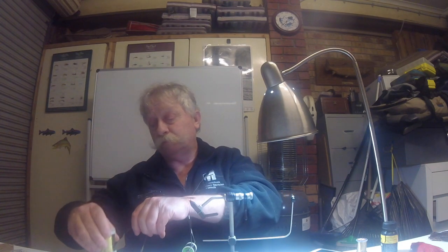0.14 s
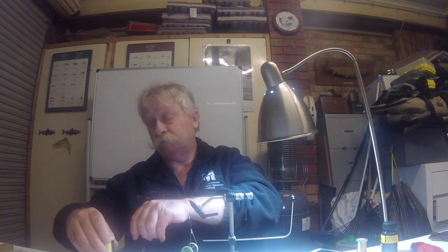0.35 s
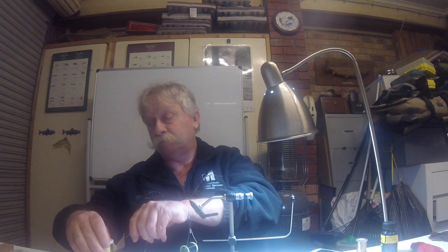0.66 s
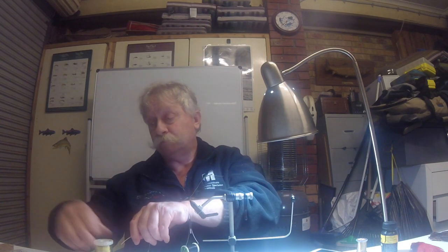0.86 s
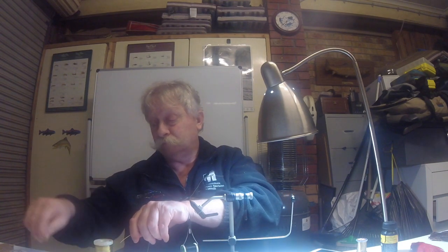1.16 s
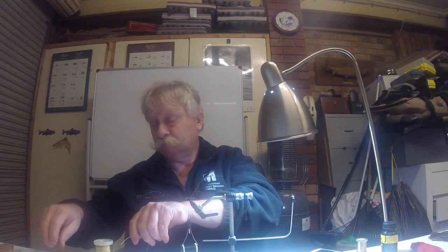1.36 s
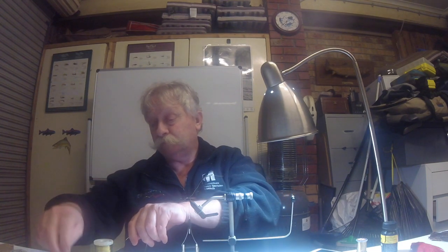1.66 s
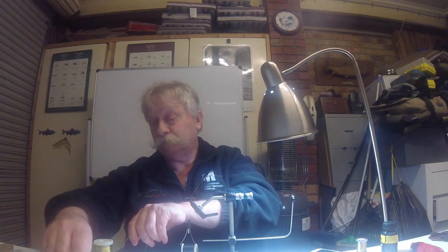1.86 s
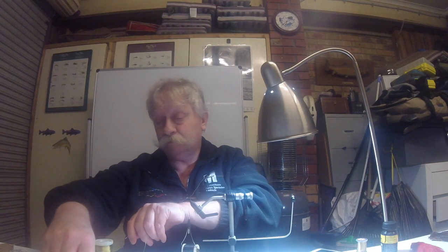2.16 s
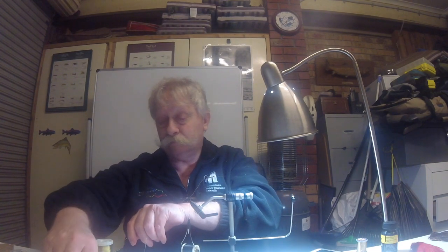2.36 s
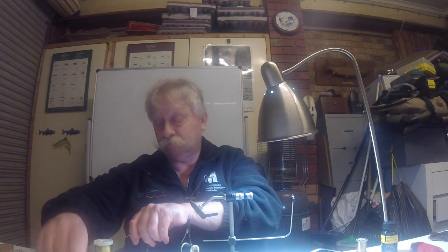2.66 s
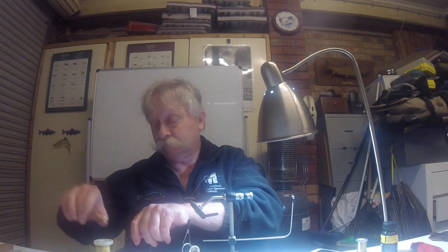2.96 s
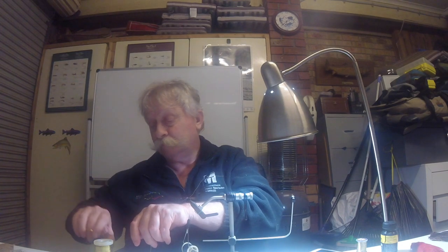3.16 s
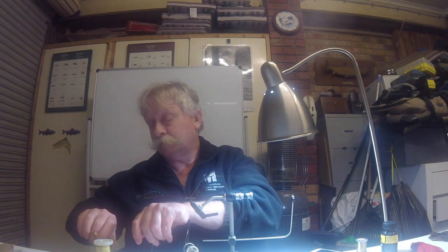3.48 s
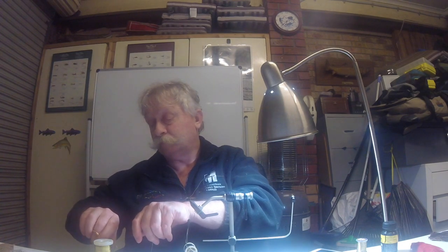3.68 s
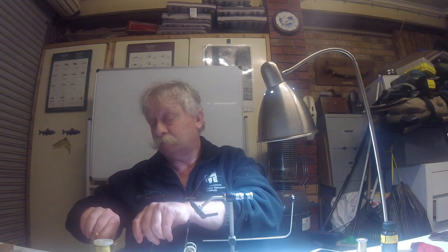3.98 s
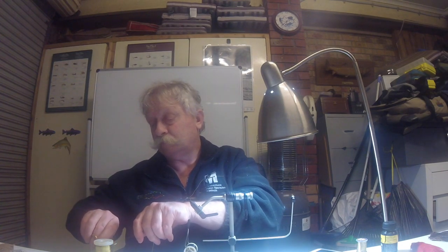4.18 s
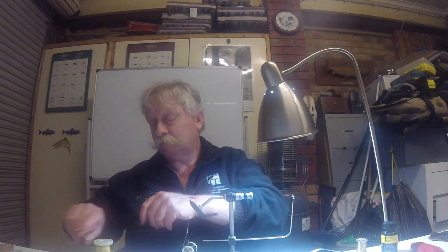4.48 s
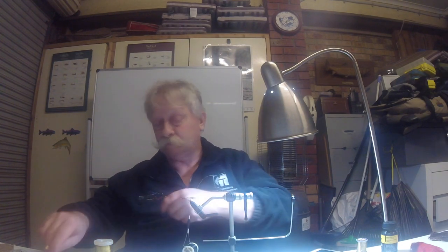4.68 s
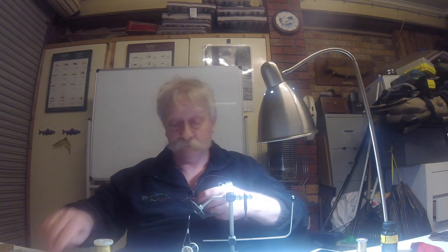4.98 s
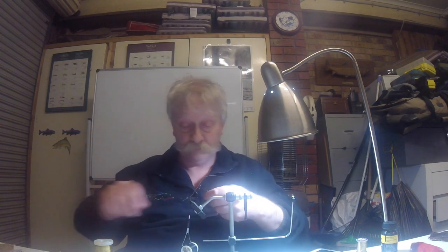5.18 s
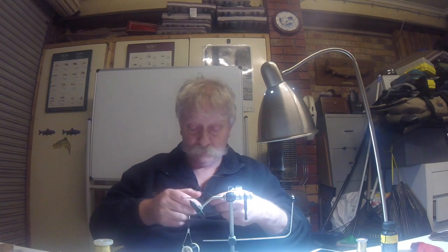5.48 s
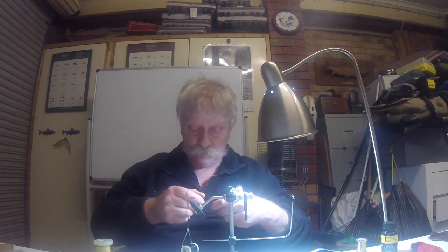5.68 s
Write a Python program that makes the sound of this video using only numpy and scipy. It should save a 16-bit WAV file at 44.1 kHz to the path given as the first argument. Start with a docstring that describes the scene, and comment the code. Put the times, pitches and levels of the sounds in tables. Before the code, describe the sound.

In a small workshop with a low rumble, a faint hum and microphone hiss, a reel is stood on a wooden bench with three light taps and a tiny squeak. Loose things are then shifted and dropped in a quick run of clicks, knocks and scrapes. After a pause comes a second, louder clatter, and the bench and room ring briefly behind it.

```python
"""Rumble, a faint hum and microphone hiss fill a small workshop. At 0.5 s a reel is stood on a wooden
bench: its rim taps three times, the hand's weight thumps the top, and it squeaks under the fingers.
From 2 s things beside it are picked up, shifted and dropped back: each impact clicks and excites the
modes of the loose things, the boards and the bench top. A second, louder clatter comes near 5 s,
and the bench and the room ring on behind it."""
import sys
import numpy as np
from scipy import signal
from scipy.fft import rfft, irfft, next_fast_len
from scipy.io import wavfile
from scipy.ndimage import uniform_filter1d

SR = 44100
rng = np.random.default_rng(int(sys.argv[2]) if len(sys.argv) > 2 else 0)


def file_out(sig):
    """Save sig as 16-bit WAV at sys.argv[1]."""
    # one column per channel
    cols = np.atleast_2d(sig).T
    # limit, then scale
    lim = np.clip(cols, -1, 1)
    pcm = np.round(lim * 32767).astype(np.int16)
    wavfile.write(sys.argv[1], SR, pcm)


N = 257544
TIME = np.arange(N) / SR
RING_TIME = TIME[:SR]

# spectra of the room's rumble and the microphone's hiss: f/Hz, relative level/dB
RUMBLE_SPECTRUM = [(20, -13.5), (38, 2.5), (70, -1.5), (100, -3.5), (150, -13), (300, -17), (600, -22.5),
                   (1100, -22.5), (2000, -28.5), (3500, -34), (4500, -44.5), (14000, -68)]
HISS_SPECTRUM = [(2000, -27), (4300, -20), (5200, -12), (5950, -10.5), (6450, 4.5), (7100, -2.5),
                 (8500, -5), (10400, -14), (11800, -11), (13200, -16), (14400, -31)]
# decay of the workshop's reverberation and of a struck body's dense modes: f/Hz, T60/s
WORKSHOP_T60 = [(100, 0.86), (400, 0.21), (1000, 0.55), (3000, 0.74), (6000, 0.26), (12000, 0.39)]
DENSE_MODE_T60 = [(150, 0.15), (1000, 0.09), (4000, 0.095), (10000, 0.022)]
# contact spectra of small parts, the reel and loose things on wood: f/Hz, relative level/dB
TICK_SPECTRUM = [(500, -3), (2000, -10.5), (3300, 0), (5400, -7), (6600, -8.5), (8000, -17), (13000, -41)]
REEL_SPECTRUM = [(150, -4.5), (400, -8), (650, -12), (800, -2.5), (1030, -8), (1300, -8), (1600, -23),
                 (2400, -13), (3500, -26), (6000, -41), (12000, -52)]
CLATTER_SPECTRUM = [(60, 2.5), (150, -2.5), (260, 9), (330, 1.5), (440, 12), (560, -0.5), (780, 2),
                    (1100, 2), (1400, -2.5), (1950, -9.5), (2600, -6), (3400, -7.5), (4800, -19),
                    (6200, -19.5), (7500, -27.5), (10000, -37.5), (14000, -54)]
# modes of the reel's rim, the bench top and the boards with their load: f/Hz, relative level/dB, T60/s
RIM_MODES = [(1000, 5, 0.037), (1117, -3, 0.037), (2400, -23, .025)]
BENCH_MODES = [(33.7, -18, 2), (62, -49, 0.39), (81.1, -6.5, 0.47), (111.3, -0.5, 0.36),
               (180.6, -2.5, 0.22), (192.8, -16, 0.54), (228.5, -15, 0.29), (296.7, -14.5, 0.57)]
BOARD_MODES = [(266.4, 2, 0.34), (291.5, -1.5, 0.53), (390, -8, 0.26), (448, 4, 0.25), (480.8, -0.5, 0.39),
               (608, -32, 0.16), (694, -2.5, 0.34), (755, -1, 0.27), (914, 2.5, 0.14), (1122, -3, 0.46),
               (1158, -8.5, 0.47), (1558, -12, 0.57), (1609, -12, 0.14), (2420, -12, 0.39),
               (2770, -10.5, 0.41), (3200, -36, .3), (3400, -18, 0.23), (4177, -36, .26), (5300, -54, 0.15),
               (6150, -20, 0.19), (6230, -14, 0.16)]
# small hard parts clicking together: t/s, level/dB
PART_TICKS = [(1.157, -59), (1.9999, -28), (2.016, -27.5), (2.133, -37.5), (2.235, -47), (2.5866, -33.5),
              (4.196, -55)]
# things pushed over the boards: t/s, duration/s, level/dB
PUSHES = [(1.99, 0.27, -32), (2.473, 0.062, -39), (2.601, 0.011, -34), (4.798, 0.24, -34.5),
          (5.04, 0.038, -22)]
# the reel set down and pressed home: t/s, tap level/dB, relative thump level/dB, push duration/s
REEL_TAPS = [(.511, -36.5, -12.5, 0.0074), (0.6257, -40.5, -16.5, 0.007), (0.778, -49, -14, 0.00405)]
# things landing: t/s, level/dB, tilt/(dB/octave), relative thump level/dB, time to first rebound/s
LANDINGS = [(1.9994, -23, -1, -18.5, 0.0082), (2.018, -24.5, -3.5, -31, .005),
            (2.0316, -16.5, -1, -17.5, 0.0089), (2.093, -23, -3, -39, 0.0093),
            (2.131, -35, -0.5, -26.5, .004), (2.234, -37, -4, -23.5, .01),
            (2.330, -43.5, 0.5, -27.5, 0.0057), (2.400, -38.5, 4, -28.5, .004),
            (2.415, -31.5, -1.5, -18, .004), (2.473, -32, -3, -30, 0.0045), (2.53, -33, -1.5, -44, 0.0071),
            (2.555, -38.5, 1, -19.5, 0.0051), (2.5866, -22.5, -1.5, -22.5, 0.00324),
            (2.612, -26, -8, -26.5, 0.0079), (4.791, -29.5, 4, -33.5, 0.0096),
            (4.860, -30.5, -0.5, -25, 0.016), (5.021, -22, -0.5, -28, 0.0074),
            (5.0397, -12.5, 1.3, -22.5, 0.012), (5.051, -17, -2, -35, 0.0074),
            (5.0903, -18, 2, -18.5, 0.0081)]


def undb(db):
    """Amplitude ratio of a level in decibels."""
    return 10 ** (np.asarray(db) / 20)


def at(points, hz):
    """Interpolation of (f/Hz, value) points in log frequency."""
    f, value = np.transpose(points)
    return np.interp(np.log(np.maximum(hz, 1)), np.log(f), value)


def level(x, db):
    """Scaling to an rms level."""
    return x * undb(db) / np.sqrt(np.mean(x ** 2))


def blow_level(x, db):
    """Equal energy: a transient gets the energy of 10 ms of steady sound at this level."""
    return x * undb(db) * np.sqrt(.01 * SR / np.sum(x ** 2))


def add(track, s, sound):
    """Superposition: a sound joins the track at s seconds."""
    part = track[int(s * SR):][:len(sound)]
    part += sound[:len(part)]


def colour(x, points, tilt_db=0):
    """Minimum-phase filtering to a spectrum, tilted by tilt_db per octave about 1 kHz."""
    size = 2 * next_fast_len(len(x), real=True)
    hz = np.fft.rfftfreq(size, 1 / SR)
    octaves = np.log2(np.maximum(hz, 250) / 1000)
    cepstrum = irfft(np.log(undb(at(points, hz) + tilt_db * octaves)))
    cepstrum[1:size // 2] *= 2  # folding onto positive time makes the filter causal
    cepstrum[size // 2 + 1:] = 0
    return irfft(rfft(x, size) * np.exp(rfft(cepstrum)))[:len(x)]


def dying_noise(t60_points, size):
    """Modal overlap: dense modes merge into noise of unit energy, each octave with its own decay."""
    t, hz = TIME[:size], np.fft.rfftfreq(size, 1 / SR)
    octave = np.log2(np.clip(hz, 125, 16000) / 125)
    noise, out = rfft(rng.standard_normal(size)), 0
    for k in range(8):
        share = np.maximum(1 - abs(octave - k), 0)
        decay = undb(-60 * t / at(t60_points, 125 * 2 ** k))
        band = irfft(noise * share, size) * decay
        out = out + band * np.sqrt(np.mean(share) / np.sum(band ** 2))
    return out / np.sqrt(np.sum(out ** 2))


def ring(modes, gains):
    """Free vibration: a sum of damped sinusoids, each with its own gain."""
    return sum(gain * undb(db - 60 * RING_TIME / t60) * np.sin(2 * np.pi * hz * RING_TIME)
               for (hz, db, t60), gain in zip(modes, gains))


def contact(points, db, tilt_db=0, *, crack_db, crack_t60):
    """Impact excitation: a broadband crack together with the struck body's dense modes."""
    body = dying_noise(DENSE_MODE_T60, size=8192)
    crack = dying_noise([(1000, crack_t60)], size=8192)
    return blow_level(colour(body + undb(crack_db) * crack, points, tilt_db), db)


def background(hum_hz=65.5, waver=0.16, drift=0.01185):
    """Stationary rumble and hiss, with a hum slowly modulated in amplitude and frequency."""
    rumble = level(colour(rng.standard_normal(N), RUMBLE_SPECTRUM), db=-48.5)
    hiss = level(colour(rng.standard_normal(N), HISS_SPECTRUM), db=-60)
    swell, wander = (signal.resample(row, N) for row in rng.standard_normal((2, 30)))
    phase = 2 * np.pi * np.cumsum(hum_hz * (1 + drift * wander)) / SR
    hum = (1 + waver * swell) * np.sin(phase)
    return rumble + hiss + level(hum, db=-50.5)


def workshop(x, wet_db, first_echo_s=0.00086, build_s=0.02):
    """Reverberation: the diffuse field of a small, cluttered room follows the direct sound."""
    build_up = np.clip((RING_TIME - first_echo_s) / build_s, 0, 1)
    tail = dying_noise(WORKSHOP_T60, size=SR) * build_up
    return x + undb(wet_db) * signal.fftconvolve(x, tail)[:N]


def squeak(peak_s=.838, hz=5400, peak_db=-56.5, half_width_s=0.0081, jitter=0.039):
    """Friction tone: the reel slips under the fingers with a brief, unsteady pitch."""
    unsteady = level(uniform_filter1d(rng.standard_normal(N), size=40), 0)
    tone = np.sin(2 * np.pi * np.cumsum(hz * (1 + jitter * unsteady)) / SR)
    return undb(peak_db) * tone * np.exp(-((TIME - peak_s) / half_width_s) ** 2)


def ticks():
    """Light impacts: small hard parts click brightly and leave the bench at rest."""
    out = np.zeros(N)
    for s, db in PART_TICKS:
        add(out, s, contact(TICK_SPECTRUM, db, crack_db=4.5, crack_t60=0.031))
    return out


def slide(start_s, length_s, db, attack_s=0.011, slowing_db_per_s=42, release_s=0.043):
    """Friction envelope: a pushed thing grips quickly, fades as it slows, then stops."""
    t = np.maximum(TIME - start_s, 0)
    attack = np.minimum(t / attack_s, 1)
    release = np.exp(-np.maximum(t - length_s, 0) / release_s)
    return attack * undb(db - slowing_db_per_s * t) * release


def drag(catches_per_s=1800, scatter_db=3, tilt_db=-2.1, ring_db=-8):
    """Roughness noise: sliding things catch on the grain, driving the boards with random impulses."""
    catches = (rng.random(N) < catches_per_s / SR) * rng.choice([-1, 1], N)
    catches = catches * undb(scatter_db * rng.standard_normal(N))
    scrape = level(colour(catches, CLATTER_SPECTRUM, tilt_db), 0)
    response = ring(BOARD_MODES, np.ones(len(BOARD_MODES)))
    boards = level(signal.fftconvolve(catches, response)[:N], ring_db)
    return (scrape + boards) * sum(slide(*push) for push in PUSHES)


def thump(db, push_s):
    """Contact time as a low-pass filter: a push barely excites bench modes above 1 / push_s."""
    hz = np.transpose(BENCH_MODES)[0]
    gains = 0.5 / (1 + (hz * push_s) ** 4)
    return undb(db) * ring(BENCH_MODES, gains)


def reel(rim_db=2):
    """Impact and loading: the rim taps and rings, then the hand's weight drives the bench top."""
    taps, ringing = np.zeros(N), np.zeros(N)
    rim = ring(RIM_MODES, np.ones(len(RIM_MODES)))
    for s, tap_db, thump_db, push_s in REEL_TAPS:
        add(taps, s, contact(REEL_SPECTRUM, tap_db, crack_db=-8, crack_t60=0.077))
        add(ringing, s, blow_level(rim, tap_db + rim_db))
        add(ringing, s + push_s, thump(thump_db, push_s))
    return taps, ringing


def bounces(s, db, tilt_db, gap_s, touches=3, gap_ratio=.8, loss_db=8, tilt_step_db=0.05):
    """Restitution: after a landing, each rebound comes sooner and weaker than the last."""
    for k in range(touches):
        yield s, db - k * loss_db, tilt_db + k * tilt_step_db
        s += gap_s * gap_ratio ** k


def clatter(ring_db=-5, scatter_db=4.5, push_s=0.00067):
    """Modal excitation: each thing lands at a different point and so weights the modes anew."""
    knocks, boards = np.zeros(N), np.zeros(N)
    octaves = np.log2(np.transpose(BOARD_MODES)[0] / 1000)
    signs = (-1) ** np.arange(len(BOARD_MODES))  # neighbouring modes swing opposite ways
    for s, db, tilt_db, thump_db, gap_s in LANDINGS:
        gains = signs * undb(scatter_db * rng.standard_normal(len(BOARD_MODES)) + tilt_db * octaves)
        for touch_s, touch_db, touch_tilt in bounces(s, db, tilt_db, gap_s):
            knock = contact(CLATTER_SPECTRUM, touch_db, touch_tilt, crack_db=-3.5, crack_t60=0.0079)
            add(knocks, touch_s, knock)
        add(boards, s, blow_level(ring(BOARD_MODES, gains), db + ring_db))
        add(boards, s, thump(thump_db, push_s))
    return knocks, boards


def scene():
    """Direct-to-reverberant ratio: the ringing arrives more directly than the knocks and clicks."""
    knocks, boards = clatter()
    taps, reel_ringing = reel()
    clunks = workshop(knocks + drag(), wet_db=-4.0)
    clicks = workshop(ticks() + taps + squeak(), wet_db=-4.5)
    ringing = workshop(boards + reel_ringing, wet_db=-7.5)
    return (clunks + clicks + ringing + background())[None]


def record(dry, low_hz=20, peak=.8, top_hz=14000):
    """Band limiting and clipping: the deepest rumble, any extreme peaks and the top treble are cut."""
    high_pass = signal.butter(2, low_hz, "high", fs=SR, output="sos")
    low_pass = signal.ellip(8, .2, 70, top_hz, fs=SR, output="sos")
    clipped = np.clip(signal.sosfilt(high_pass, dry), -peak, peak)
    return signal.sosfilt(low_pass, clipped)


dry = scene()
out = record(dry)
file_out(out)
```